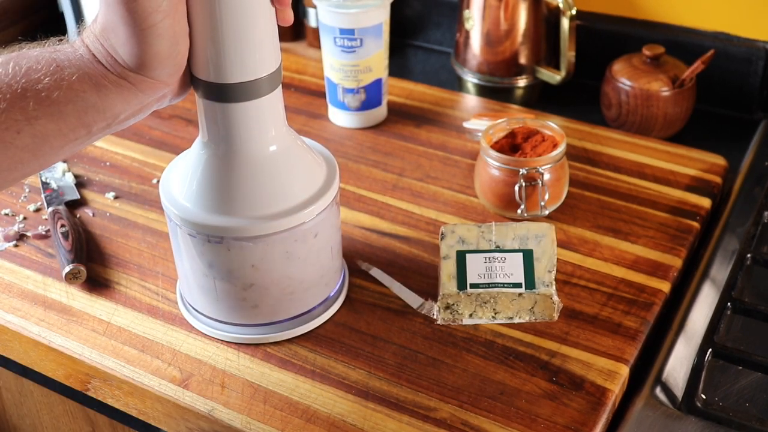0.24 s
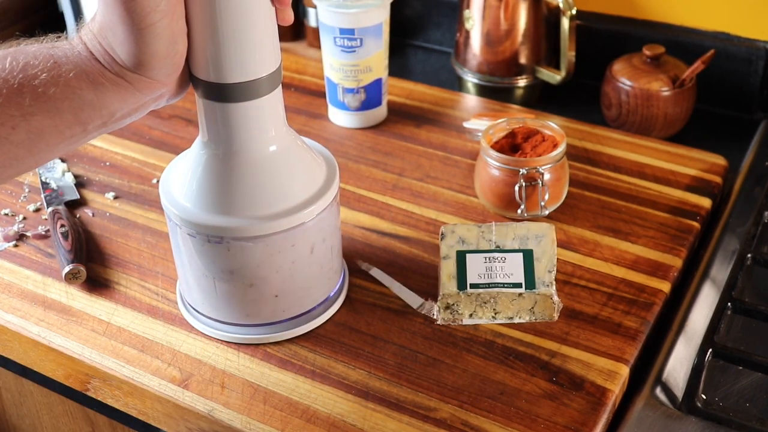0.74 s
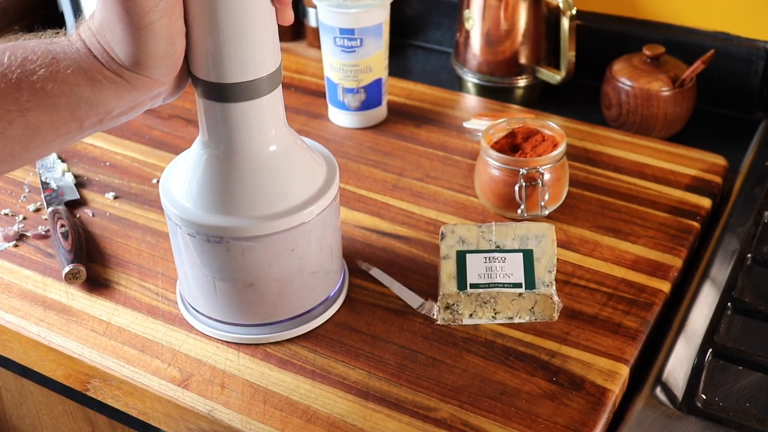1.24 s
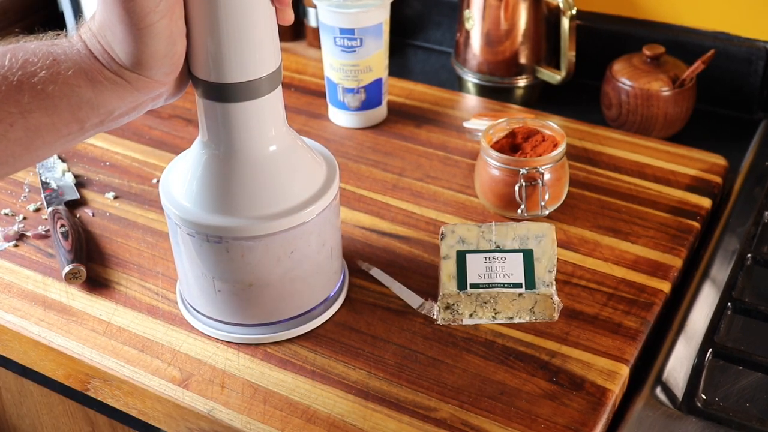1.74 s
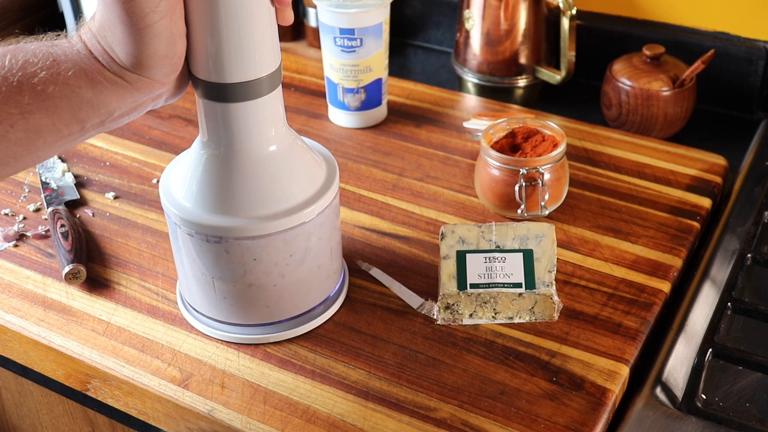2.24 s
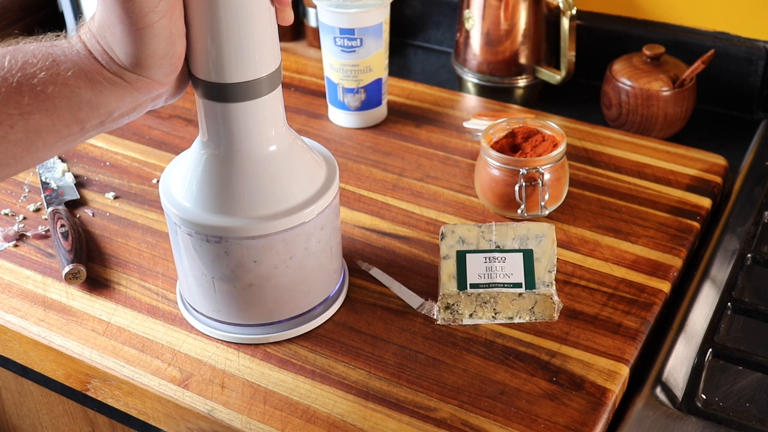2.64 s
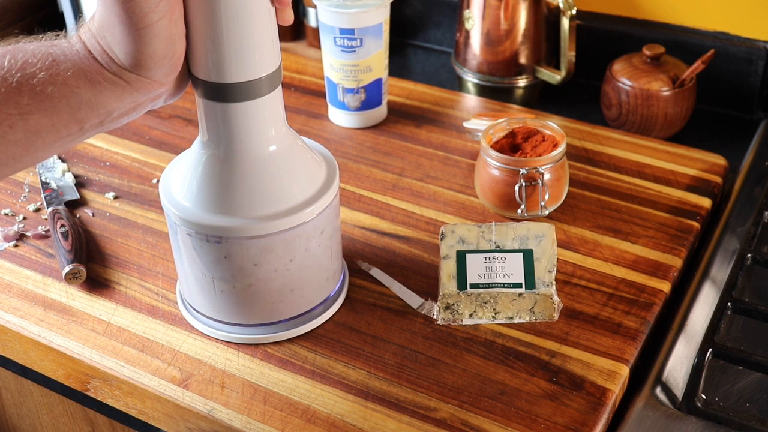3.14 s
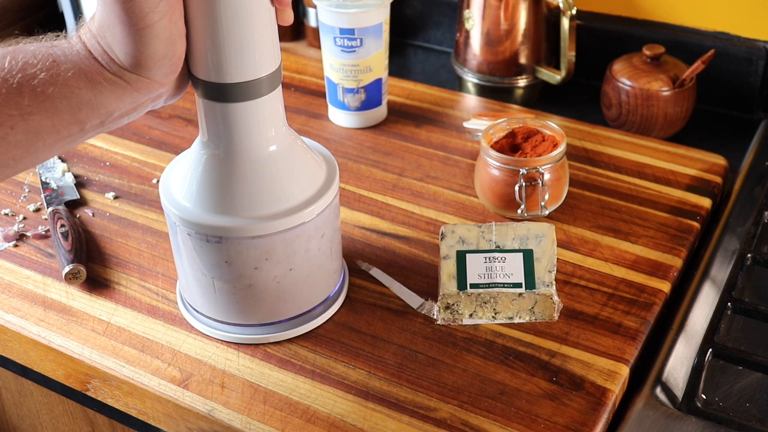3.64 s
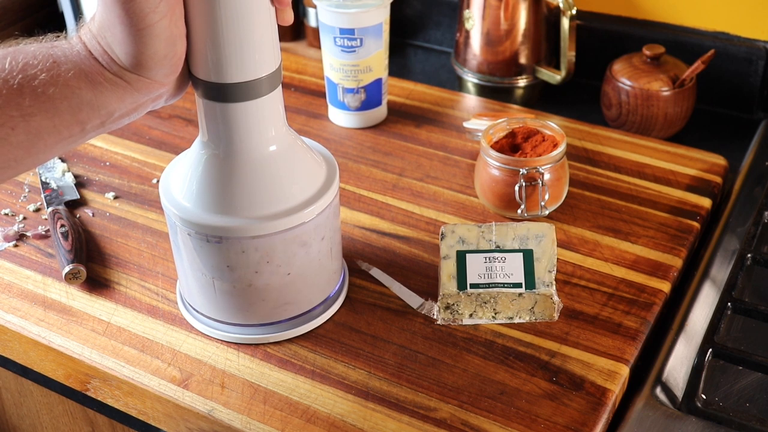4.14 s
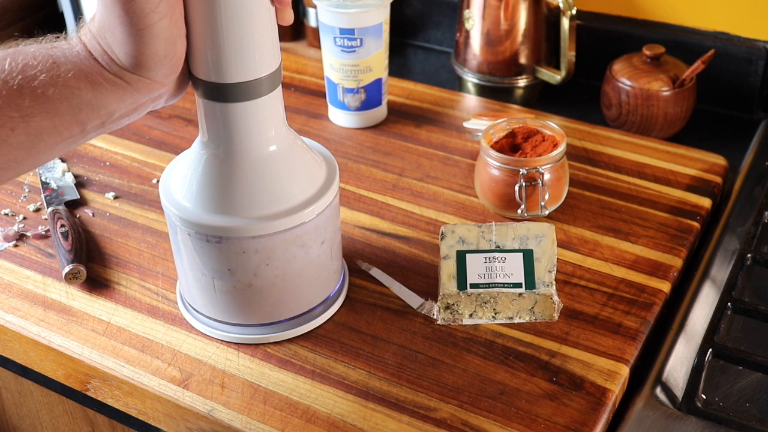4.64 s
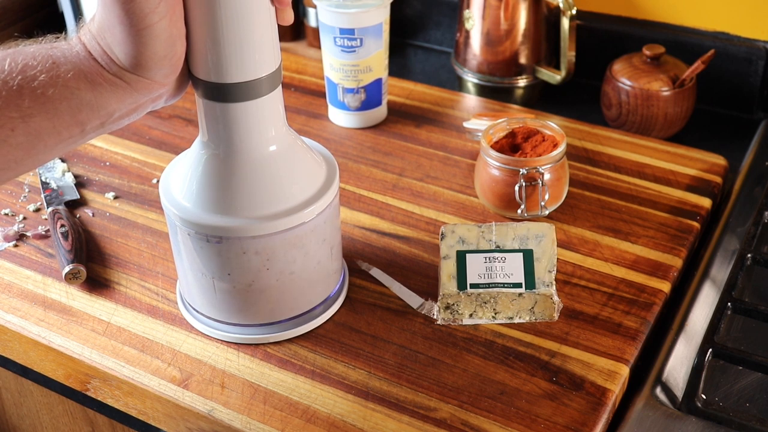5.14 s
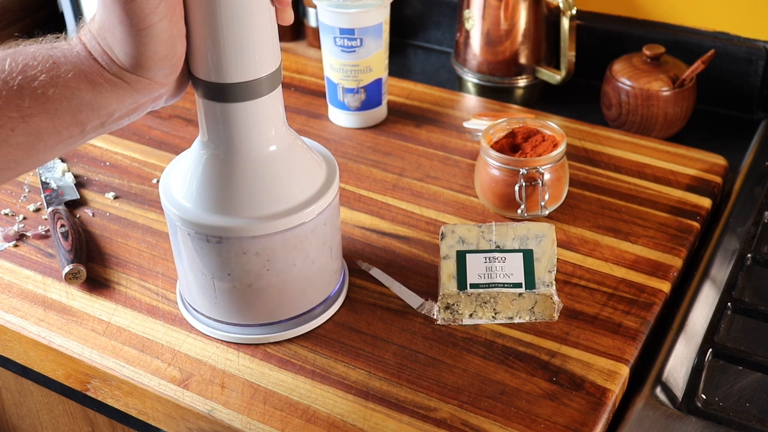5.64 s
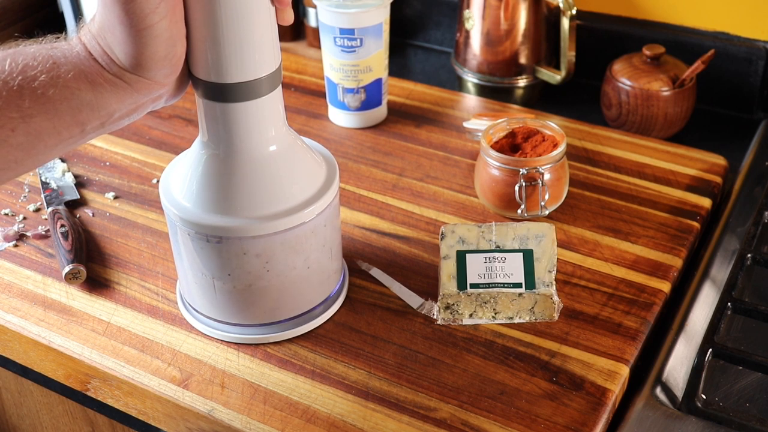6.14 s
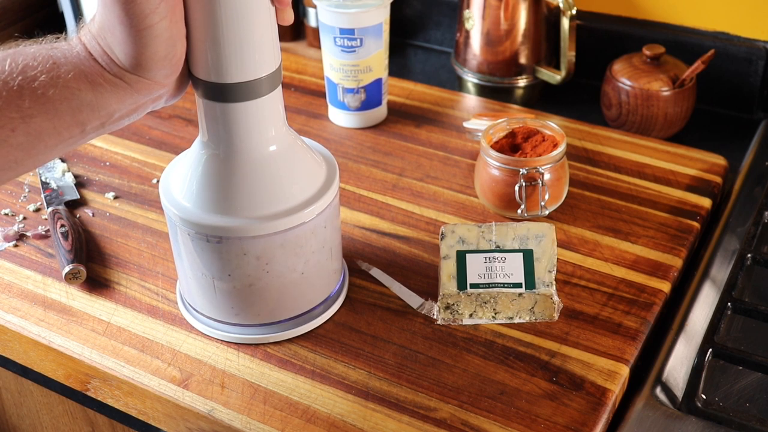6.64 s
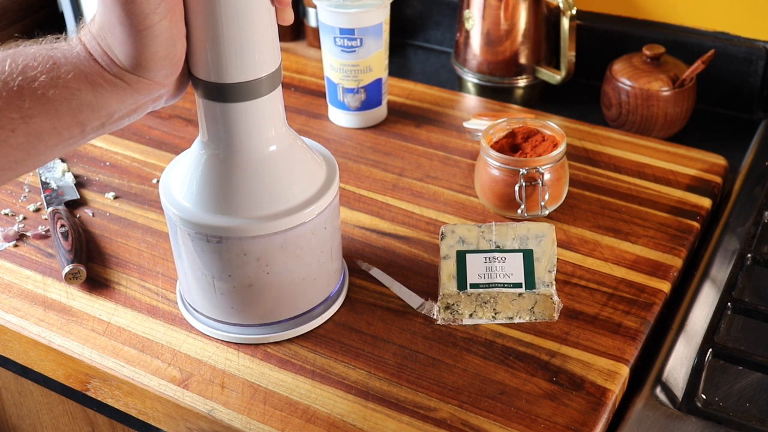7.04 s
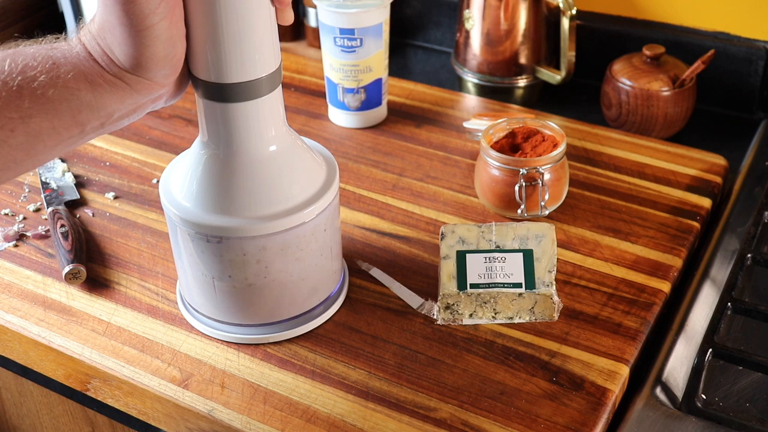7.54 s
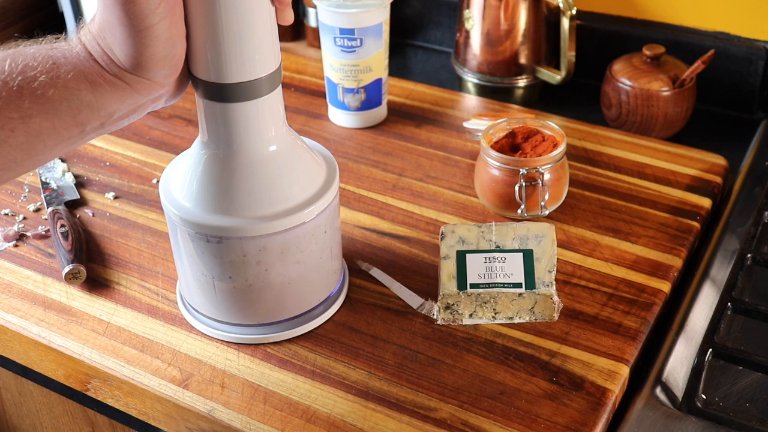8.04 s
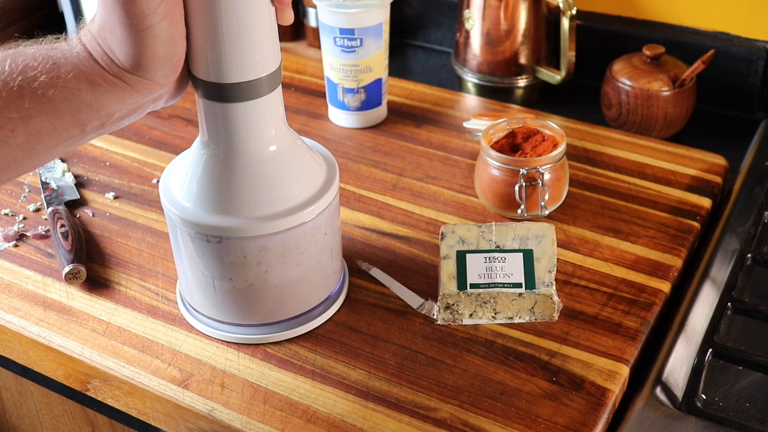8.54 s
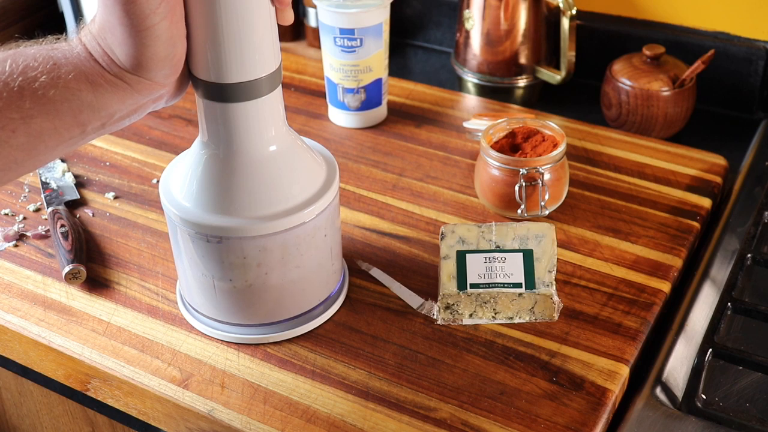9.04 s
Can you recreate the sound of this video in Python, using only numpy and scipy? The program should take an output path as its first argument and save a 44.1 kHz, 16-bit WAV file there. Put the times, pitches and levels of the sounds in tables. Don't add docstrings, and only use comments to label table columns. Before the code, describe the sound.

An electric hand blender is already running at full power, close up. A bright, dense plastic rattle and hiss dominates, with a thin motor hum beneath. In the first two and a half seconds hard bits knock sharply against the bowl wall; then the food becomes paste and the noise evens out, pitch creeping slightly upward. Small kitchen, short hard echo, close mono phone microphone, no stop.

```python
import sys
import numpy as np
from scipy import signal
from scipy.fft import rfft, irfft
from scipy.io import wavfile
from scipy.ndimage import uniform_filter1d

SR = 44100
rng = np.random.default_rng(int(sys.argv[2]) if len(sys.argv) > 2 else 0)


def wav_record(signal):
    frames = np.transpose(np.atleast_2d(signal))
    bounded = np.clip(frames, -1, 1)
    quanta = np.round(bounded * 32767).astype(np.int16)
    wavfile.write(sys.argv[1], SR, quanta)


def how_loud(loudness_db):
    steps = np.asarray(loudness_db, float) / 20
    return 10 ** steps


N = 409248
CARRIER = 0.148


def at(table, column):
    rows = np.array(table, float)
    return np.interp(np.arange(N) / SR, rows[:, 0], rows[:, column])


def walk(rate):
    hold = int(SR / rate)
    levels = np.repeat(rng.standard_normal(N // hold + 1), hold)
    smooth = uniform_filter1d(uniform_filter1d(levels, hold), hold)[:N]
    return smooth / smooth.std()


def fall(t, t60):
    return np.exp(-np.log(1000) * t / t60)


# (t/s, state 0 whole 1 coarse 2 paste, lopsided blade load [0-1], rattle level/dB)
FOOD = [(0, .13, 0.55, -15), (.07, .15, 0.87, -16), (.2, .2, .8, -18), (.5, 0.24, 0.78, -17.5),
        (.75, .58, .7, -16.5), (1.1, 0.76, 0.46, -16.5), (1.5, 0.93, 0.61, -17.5), (2.1, 1.05, 0.58, -17),
        (2.35, 1.26, 0.34, -17.5), (2.8, 1.55, .3, -17), (3.2, 1.7, .3, -16.2), (4.1, 1.88, .1, -17),
        (5.2, 1.84, 0.11, -17), (6.1, 1.94, 0.23, -16.5), (7, 2, 0.57, -17), (7.8, 1.95, 0.55, -16.5),
        (8.6, 1.96, .9, -16.5), (9.28, 1.97, .8, -17.5)]


def food(column):
    return at(FOOD, column)


STAGES = (0, .7, 1.1, 1.5, 2)


def staged(state, row):
    return np.interp(state, STAGES, row)


# (t/s, rotor speed [turns/s])
SPEED = [(0.0, 219.7), (0.1, 223.9), (0.2, 228.6), (0.3, 235.2), (0.6, 238.8), (0.7, 237), (0.85, 242.7),
         (1.0, 242.9), (1.4, 239.8), (1.8, 243.6), (2.25, 243.4), (2.5, 246.2), (3.0, 247.3), (3.5, 247.6),
         (4.5, 249.3), (6.0, 250.6), (7.0, 251.9), (9.28, 253.7)]
MAIN_DB = [
    (-63, -59, -62, -59, -51.5),
    (-49, -52, -51.5, -53, -55),
    (-47, -53, -45, -43, -36),
    (-43, -29, -30.5, -51, -34),
    (-44, -55, -43, -34.5, -33.5),
]
# (level/dB), one per line
LOPSIDED_DB = (16, 16.5, 0.5, -16, -0.5)
WEAK_LINES = [(.25, 0), (2, 1), (2, -1), (15, -1), (1.25, 2), (2.25, 2), (1, 1), (4, -1), (7, 0), (0, 1)]
# (level/dB while coarse, level/dB when fine)
WEAK_DB = [(-69, -75), (-51.5, -40.5), (-54, -53), (-56, -34.5), (-62, -53), (-44.5, -45.5), (-66, -70),
           (-43, -44), (-42, -50), (-80, -82)]


def hum(state):
    speed = at(SPEED, 1) * (1 + 0.000803 * walk(9))
    turns = 2 * np.pi * np.cumsum(speed) / SR
    fine, lopsided = np.clip(state - 1, 0, 1), food(2)
    lines = []
    for multiple, row, gain_db in zip((1 - CARRIER, 1, 2, 3, 4), MAIN_DB, LOPSIDED_DB):
        lines.append((multiple, staged(state, row) + gain_db * lopsided))
    for (rotor, carrier), (coarse_db, fine_db) in zip(WEAK_LINES, WEAK_DB):
        lines.append((rotor + carrier * CARRIER, coarse_db + (fine_db - coarse_db) * fine))
    total = np.zeros(N)
    for multiple, db in lines:
        drift_db = 1.2 * walk(5)
        flicker_db = 0.16 * min(multiple, 4) ** 2 * walk(30)
        wave = np.sin(multiple * turns + 2 * np.pi * rng.random())
        total += np.sqrt(2) * how_loud(db + drift_db + flicker_db) * wave
    return total, turns


def ticks(per_s, spread_db):
    size_db = np.minimum(spread_db * rng.exponential(size=N), 12)
    happens = rng.random(N) < per_s / SR
    return happens * rng.choice([-1, 1], N) * how_loud(size_db)


# (f/Hz, level/dB)
COLOUR = [(30, -47), (90, -34.5), (140, -24), (200, -11), (300, -15), (430, -8.5), (700, -4.5),
          (1100, -2.5), (2000, -1), (2900, -5), (4500, -1.5), (6500, -12), (10000, -22.5), (15500, -37)]
# (f/Hz, width/Hz, level/dB whole, level/dB coarse, level/dB paste)
BOARD = [(62, 14, 2, 7, 5), (85, 17, -3, -4, -4), (233, 25, -5, -7.5, -3.5), (271, 22, -7, -7, -12),
         (355, 54, 1, -2, -6), (418, 30, -0.5, 1, 1), (486, 50, -4, 1, 1.5), (524, 13, -1, -2, -18)]
# (f/Hz, width/Hz, level/dB whole, level/dB coarse, level/dB paste)
BOWL = [(637, 52, 0.5, 3.5, 2), (697, 45, -2, -2, -3.5), (773, 27, -3, -2, -2.5), (895, 78, 2, 1.5, 1.5),
        (971, 78, 1.5, 4.5, 5), (1060, 47, 0, 4, -0.5), (1146, 90, 0, -1.5, -1.5), (1285, 40, 3, 4.5, 6),
        (1670, 48, 0, 2, 3), (1748, 73, 1.5, 6.5, 5.5), (1835, 51, -3, -4, -4), (1950, 300, 2, 2.5, 1),
        (2205, 100, 2, 2, 4.5)]
# (f/Hz, width/Hz, level/dB whole, level/dB coarse, level/dB paste)
LID = [(2780, 360, -2.5, 1, -1.5), (3200, 200, 0, 0, -0.5), (3740, 230, 1, 4.5, 2.5),
       (3960, 280, 0, 4, 0.5), (4345, 410, -5, -1.5, -4.5), (4870, 470, 2, 1.5, 2.5), (5970, 740, 3, -1, 2),
       (7700, 500, 2, 0.5, -2), (10200, 180, -3, 4, -1.5), (12900, 500, -1, -1, 3)]
# (f/Hz, width/Hz, level/dB)
SHELL = [(1503, 50, 2), (2090, 68, 1.5), (2350, 55, 0), (2546, 33, 3), (2710, 55, 1.5), (2800, 60, -1),
         (3040, 150, 1.5), (3400, 100, -1), (3510, 78, 3), (3990, 68, 0), (4240, 81, -1), (4400, 90, 1),
         (5280, 100, 2), (5850, 110, 2), (6080, 90, 0), (6300, 130, 1.5), (6500, 130, -2.5), (7200, 260, 1),
         (8500, 600, 1.5)]


def response(column, size=8192):
    hz = np.fft.rfftfreq(size, 1 / SR) + 1
    colour = np.array(COLOUR, float)
    db = np.interp(np.log(hz), np.log(colour[:, 0]), colour[:, 1])
    modes = [(m[0], m[1], m[column]) for m in BOARD + BOWL + LID] + SHELL
    for f, width, gain_db in modes:
        db = db + gain_db / (1 + ((hz - f) / (width / 2)) ** 2)
    cepstrum = irfft(np.log(how_loud(db)))
    cepstrum[1:size // 2] *= 2
    cepstrum[size // 2 + 1:] = 0
    return rfft(irfft(np.exp(rfft(cepstrum))), N)


SPLIT_HZ = (300, 1400, 3000)
OWN_TICKS = (0.24, 0.57, 1.07, 1.87, 1.64)
PARTS = [
    (-25, -25, -26, -24.5, -28.5),
    (-7.5, -7, -9.5, -7.5, -8.5),
    (-3.5, -7.5, -10, -6.5, -5.5),
    (-3, -3.5, -2.6, -3.5, -3),
    (-4, 1, 1.3, .5, 0.6),
]
# (level/dB) for board, bowl, lid, housing
KICK_DB = (7, -1, 2, -2)


def rattle(turns, state):
    hz = np.fft.rfftfreq(N, 1 / SR)
    flurry_db = 0.68 * walk(300) + 0.32 * walk(70) + 0.067 * walk(22)
    flurry_db += 0.63 * np.sin(turns) + 0.13 * np.sin(CARRIER * turns)
    shared = rng.standard_normal(N) + 0.7 * ticks(2500, 3.2)

    below = [0 * hz]
    below += [1 / (1 + (hz / edge) ** 12) for edge in SPLIT_HZ]
    below += [1 / (1 + (hz / 9000) ** 6), 1 + 0 * hz]
    rings = [response(column=2 + k) for k in range(3)]
    shares = [np.clip(1 - abs(state - k), 0, 1) for k in range(3)]
    parts = []
    for low, high, own in zip(below, below[1:], OWN_TICKS):
        blows = (shared + own * ticks(1500, 4.2)) / np.sqrt(1 + 0.2 * own ** 2)
        band = rfft(blows * how_loud(flurry_db)) * (high - low)
        parts.append(sum(share * irfft(band * ring, N) for share, ring in zip(shares, rings)))

    top_db = staged(state, PARTS[4]) + 0.5 * walk(8) + 0.52 * walk(120)
    parts[3:] = [parts[3] + how_loud(top_db) * parts[4]]
    kick = np.exp(-np.arange(N) / SR / 0.078)
    levelled = []
    for row, kick_db, part in zip(PARTS, KICK_DB, parts):
        db = staged(state, row) + kick_db * kick + 0.12 * walk(3.04) + 0.26 * walk(25)
        levelled.append(how_loud(db) * part / part.std())
    board_db = uniform_filter1d(food(3), SR // 2)
    surging_db = food(3) + 0.3 * walk(11)
    return how_loud(board_db) * levelled[0] + how_loud(surging_db) * sum(levelled[1:])


# (t/s, peak level/dB, ring f/Hz)
KNOCKS = [(0.074, -1, 3290), (0.128, -2, 3850), (0.469, -5, 4610), (0.6195, -1, 3250), (0.782, 1, 4560),
          (0.7916, -4, 3780), (0.8664, -8, 4730), (1.1178, 4, 3800), (1.2059, -4, 4120), (1.2143, -1, 3990),
          (1.412, -2, 4000), (1.4972, 1.5, 3860), (1.8161, -2, 3770), (1.9363, -7, 4080),
          (1.9709, -3, 4870), (2.173, 1, 4640), (2.2138, -4, 4640), (2.2531, -2, 4600), (2.2732, -7, 3640),
          (2.3121, 0, 3790), (2.362, 2, 4570), (3.423, -3, 3760), (4.1549, -2, 4840), (4.7605, -4, 3700),
          (5.132, -3, 3710), (5.191, -6, 4540), (6.8188, -2, 3740), (7.0895, -3, 4850), (7.2869, -2, 3540),
          (9.0446, -2, 3700)]
# (lowest f/Hz, highest f/Hz)
STRAY_HZ = (3500, 4900)


def knocks():
    out, t = np.zeros(N), np.arange(600) / SR
    strays = []
    for when, soft, pitch in rng.random((30, 3)):
        s = when ** 2 * (N - len(t)) / SR
        strays.append((s, -6 - 2 * soft, np.interp(pitch, (0, 1), STRAY_HZ)))
    for s, db, hz in KNOCKS + strays:
        ring = np.sin(2 * np.pi * hz * t) * fall(t, 0.004)
        ring += 0.35 * np.sin(2 * np.pi * 1500 * t) * fall(t, 0.005)
        bounce_s = rng.uniform(0.00086, 0.00197)
        ring += 0.5 * np.roll(ring, int(bounce_s * SR))
        i = int(s * SR)
        out[i:i + len(t)] += how_loud(db - 3) * ring
    wall = signal.butter(3, (700, 9000), "band", fs=SR, output="sos")
    return signal.sosfilt(wall, out)


def kitchen(x):
    room_t60_s, room_db = 0.3, -18
    t = np.arange(int(0.3 * SR)) / SR
    tail = rng.standard_normal(len(t)) * fall(t, room_t60_s) * (t > 0.002)
    tail *= how_loud(room_db) / np.sqrt(np.sum(tail ** 2))
    tail[0] = 1
    lead = np.concatenate([x[len(t):0:-1], x])
    wet = signal.fftconvolve(lead, tail)[len(t):len(t) + N]
    return wet / np.sqrt(np.sum(tail ** 2))


def scene():
    state = np.clip(food(1), 0, 2)
    lines, turns = hum(state)
    mix = lines + kitchen(rattle(turns, state) + knocks())
    return np.tile(mix, (2, 1))


def band_limit(x):
    return signal.sosfilt(signal.butter(12, 15820, fs=SR, output="sos"), x)


def record(dry):
    return band_limit(dry)


dry = scene()
out = record(dry)
wav_record(out)
```